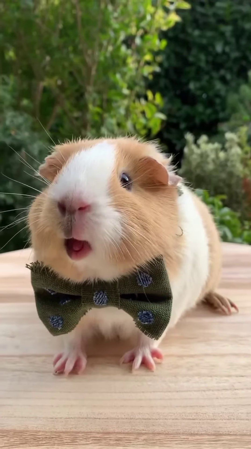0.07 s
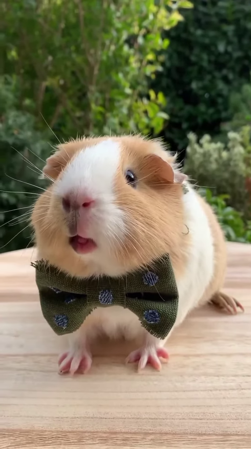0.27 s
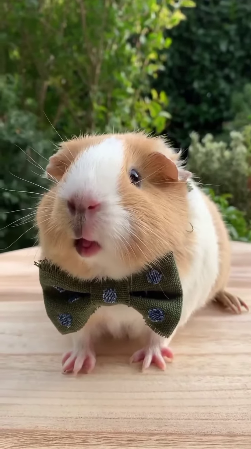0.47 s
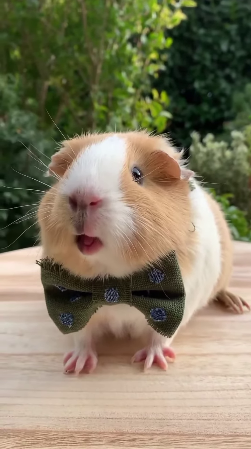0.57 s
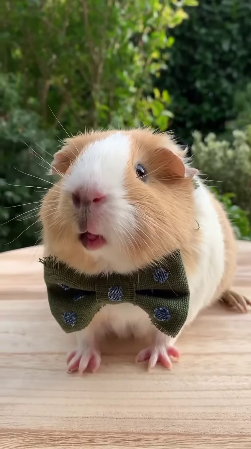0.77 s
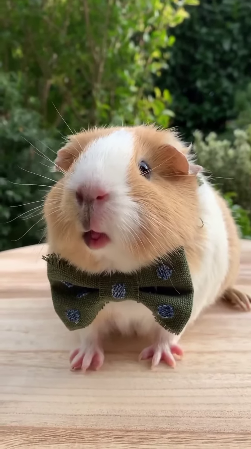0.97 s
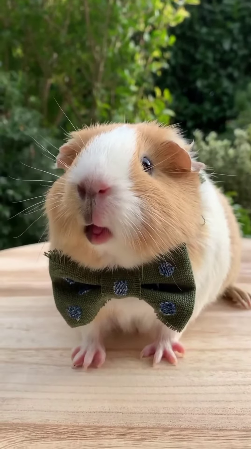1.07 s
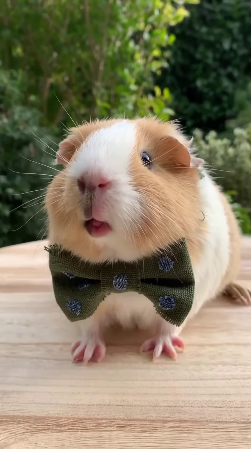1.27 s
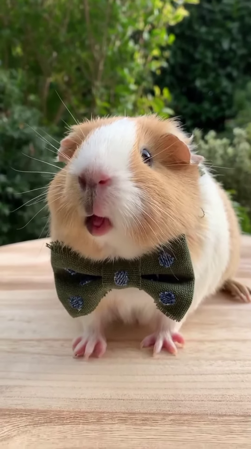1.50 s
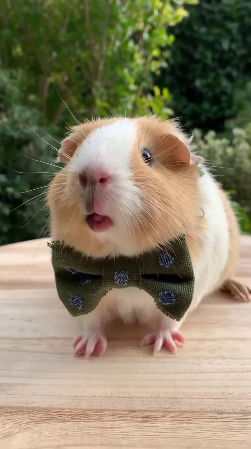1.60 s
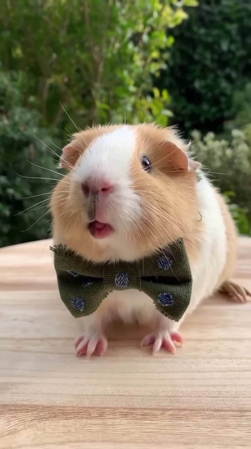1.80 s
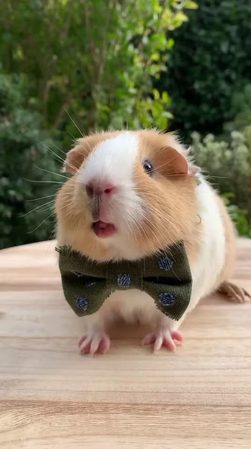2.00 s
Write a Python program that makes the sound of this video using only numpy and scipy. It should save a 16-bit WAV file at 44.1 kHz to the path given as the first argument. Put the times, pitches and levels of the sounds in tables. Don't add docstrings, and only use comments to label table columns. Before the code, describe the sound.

Close, piercing guinea pig squeaks rise one after another over a faint outdoor traffic rumble.

```python
import sys
import numpy as np
from scipy import signal
from scipy.fft import rfft, irfft, next_fast_len
from scipy.io import wavfile
from scipy.ndimage import uniform_filter1d

SR = 44100
rng = np.random.default_rng(int(sys.argv[2]) if len(sys.argv) > 2 else 0)


def voltage_ratio(level):
    return 10 ** (np.asarray(level, float) / 20)


def materialize(psi):
    bounded = np.clip(np.atleast_2d(psi).T, -1, 1)
    quanta = np.round(bounded * 32767).astype(np.int16)
    wavfile.write(sys.argv[1], SR, quanta)


N = 90404

# (f/Hz, level/dB)
TRAFFIC_COLOUR = [(25, -17.5), (45, -0.5), (66, 4.5), (90, -8.5), (125, -7.5), (220, -19), (700, -22),
                  (1100, -20.5), (1900, -30), (2700, -42.5), (5000, -68)]
# (f/Hz, likeness from 0 to 1)
TRAFFIC_LIKENESS = [(50, .9), (125, .82), (280, .7), (600, .3), (1300, .25), (3000, 0)]

# (t/s, pitch f/Hz, voice level/dB, overtone slope/dB per octave, breath level/dB)
WHEEK_1 = [(0, 754, -37, -9.5, -43), (.022, 1001, -36, -14.5, -46), (.046, 1809, -40, -11, -35),
           (.075, 1949, -32.5, -11.5, -52.5), (.105, 2099, -26, -10.5, -57),
           (.148, 2301, -21.5, -9.5, -61.5), (.18, 2357, -19, -10, -59), (.2, 2582, -23.5, -10, -58),
           (.214, 2691, -26.5, -9.5, -54), (.246, 2680, -30, -7, -46.5), (.254, 3006, -33.5, 1, -43.5),
           (.257, 3444, -33.5, -3, -46.5), (.28, 3850, -30.5, -10.5, -55), (.308, 3937, -27.5, -7, -50),
           (.330, 3882, -24, -17.5, -61.5)]
WHEEK_2 = [(.489, 945.8, -40.5, -16.5, -49.5), (.5, 782, -42.5, -4, -49.5),
           (0.514, 771.3, -35.5, -8.5, -45.5), (.54, 807.2, -38.5, -4.5, -54),
           (.553, 976, -37, -3.5, -36.5), (.564, 1391, -38, -6, -39.5), (.578, 1947, -42.5, -14.5, -30),
           (.596, 2064, -36.5, -15, -43), (.61, 2228, -27, -23, -36), (0.624, 2251, -30.5, -11.5, -35.5),
           (.63, 2562, -20.5, -18.5, -34.5), (.638, 2661, -35, -17.5, -52), (.648, 3117, -36, -8.5, -37),
           (0.659, 3184, -32, -9, -48.5), (.667, 3118, -33.5, -5.5, -47.5),
           (0.718, 3832, -25.5, -11.5, -51), (0.759, 3921, -20, -15.5, -48), (0.779, 3869, -24.5, -23, -46)]
WHEEK_3 = [(.946, 774.6, -37.5, -6, -61), (0.958, 722.2, -37.5, -15.5, -45.5),
           (0.976, 728, -33, -14.5, -53), (0.997, 757.4, -37, -10.5, -54), (1.01, 883.3, -38, -12, -41.5),
           (1.022, 1179, -36.5, -10, -46.5), (1.032, 1487, -42, -12, -44.5), (1.04, 1759, -48, -11, -36.5),
           (1.06, 1958, -44, -17.5, -42.5), (1.082, 2246, -38.5, -12, -43.5),
           (1.1, 2731, -31.5, -36.5, -42.5), (1.113, 3110, -43.5, -23, -45),
           (1.125, 3054, -33, -21.5, -52.5), (1.14, 3294, -32.5, -14.5, -44),
           (1.174, 3697, -27.5, -20, -58.5), (1.219, 3852, -21, -15.5, -53.5),
           (1.248, 3812, -26.5, -21, -44.5)]
WHEEK_4 = [(1.415, 765, -39, -10, -48.5), (1.435, 709, -33.5, -11, -66.5), (1.467, 773.7, -35.5, -9, -56),
           (1.479, 916, -35.5, -29.5, -43.5), (1.496, 1296, -37.5, -23, -45),
           (1.512, 1662, -48.5, -6.5, -39.5), (1.531, 2079, -51, -19.5, -43.5),
           (1.552, 2148, -36.5, -11, -46.5), (1.562, 2506, -33.5, -16.5, -40.5),
           (1.572, 2476, -43.5, -18.5, -43), (1.578, 3004, -41, -19, -36), (1.586, 2850, -50.5, -11, -46),
           (1.592, 3179, -33, -10.5, -45.5), (1.627, 3400, -31.5, -10.5, -39.5),
           (1.656, 3828, -32, -10.5, -57), (1.676, 3889, -26.5, -14.5, -49.5),
           (1.705, 3720, -29, -14.5, -57)]
WHEEK_5 = [(1.868, 769.3, -41, -8.5, -58), (1.889, 716.4, -34, -14, -64), (1.915, 763.4, -35.5, -9, -60.5),
           (1.93, 864.6, -41.5, -13, -53), (1.94, 1085, -36.5, -9.5, -47.5), (1.951, 1427, -45, -18, -49),
           (1.961, 1710, -49, -7.5, -48.5), (1.975, 1970, -75, -27.5, -46), (1.986, 2188, -37, -29.5, -38),
           (1.999, 2176, -30, -14, -75.5), (2.006, 2253, -39, -13, -29), (2.011, 2642, -43, -35, -45.5),
           (2.021, 2627, -38.5, -31.5, -43.5), (2.06, 3230, -43, -29, -45)]
# (t/s, length/s, level/dB against the voice)
UNEVEN_BEATS = [(0.295, 0.016, -14.5), (0.494, 0.015, -5), (0.539, 0.017, -6.5), (0.561, 0.019, -8),
                (0.589, 0.038, -20.5), (0.745, 0.03, -21), (1.022, 0.048, -3), (1.2, 0.019, -24),
                (1.522, 0.019, 3), (1.532, 0.022, -6), (1.642, 0.037, -14.5), (1.866, 0.012, -2),
                (1.928, 0.025, -1), (1.953, 0.028, 12), (1.986, 0.019, -5.5), (2.009, 0.049, -7.5)]
# (f/Hz, width/Hz, level/dB)
THROAT_AND_MOUTH = [(1400, 420, 13), (2300, 450, -4), (3900, 900, 7), (4500, 600, -8), (5400, 500, 16),
                    (5950, 600, 9), (7000, 800, -18), (7800, 900, 9), (9100, 1700, 18), (10700, 1000, 10),
                    (11900, 900, 5), (13300, 1500, -26)]
# (f/Hz, width/Hz, level/dB)
BREATH_BANDS = [(1250, 900, -3), (2300, 900, -5), (3300, 1100, -3), (4100, 700, -6), (6600, 1500, -8),
                (12200, 1700, -15)]

# (f/Hz, lead/radians)
HIGH_LEAD = [(3600, -4.5), (4000, -4.2), (4350, -3.2), (5000, -3.1), (5300, -2.1), (6370, -.1), (7100, -.1),
             (8440, 2.7), (10850, 6.1), (12230, 7.9), (12700, 9.4)]
# (f/Hz, lead/radians)
LOW_LEAD_FACING = [(0, 0), (1300, -1.2), (2040, -.9), (2200, -2.1), (2600, -2.3), (2720, -2.9)]
# (f/Hz, lead/radians)
LOW_LEAD_TURNED = [(0, 0), (900, -1.2), (1900, -1.6), (2100, -3), (2600, -3.2), (2800, -3.5), (3100, -3.8)]
# (f/Hz, level/dB)
PORT_TILT = [(300, -4.5), (730, 5.5), (1100, -1), (2000, 0), (2500, -1), (2750, -5), (3050, -1), (3900, .5),
             (13000, 0)]

# (t/s, level/dB)
PUFFS = [
    (0.252, -23),
    (0.338, -38.5),
    (0.495, -56.5),
    (0.779, -37.5),
    (0.948, -62),
    (1.251, -45),
    (1.71, -52.5),
]
# (f/Hz, level/dB)
PUFF_COLOUR = [(500, -36), (2500, -22), (4500, -8.5), (5700, 1), (6800, -7), (8500, -5), (10500, -14),
               (13000, -17)]


def at_hz(points, hz):
    p = np.array(points, float)
    return np.interp(np.log(hz + 1), np.log(p[:, 0] + 1), p[:, 1])


def coloured(points, channels):
    gain = voltage_ratio(at_hz(points, np.fft.rfftfreq(N, 1 / SR)))
    x = irfft(rfft(rng.standard_normal((channels, N))) * gain, N)
    return x / np.sqrt(np.mean(x ** 2))


def drift(hz):
    r = np.exp(-2 * np.pi * hz / SR)
    x = signal.lfilter([1], [1, -2 * r, r * r], rng.standard_normal(N + SR))[SR:]
    return x / x.std()


def gate(t, start, stop, rise, fall):
    fade_in = np.sin(np.pi / 2 * np.clip((t - start) / rise, 0, 1)) ** 2
    return fade_in * np.exp(-(np.maximum(t - stop, 0) / fall) ** 2)


def traffic():
    level_db, patchy_db = -52, 1.1
    alike = np.clip(at_hz(TRAFFIC_LIKENESS, np.fft.rfftfreq(N, 1 / SR)), -1, 1)
    shared, opposed = rfft(coloured(TRAFFIC_COLOUR, channels=2))
    left_right = np.array([[1], [-1]])
    both = irfft(np.sqrt(1 + alike) * shared + np.sqrt(1 - alike) * opposed * left_right, N)
    return voltage_ratio(level_db + patchy_db * drift(2.3)) * both


def hiss():
    return voltage_ratio(-84) * rng.standard_normal((2, N))


def tract_db(hz, opening):
    shut_loss_db, shut_from_hz = -14, 4300
    gape_loss = .8
    wide = np.clip(opening * 2.27 - .4, 0, 1)
    gape = 1 - gape_loss * np.clip(opening * 15 - 12, 0, 1)
    total_db = shut_loss_db * (1 - wide) / (1 + (shut_from_hz / hz) ** 6)
    for centre_hz, width_hz, db in THROAT_AND_MOUTH:
        peak_db = db / (1 + (2 * (hz - centre_hz) / width_hz) ** 2)
        if centre_hz > 5000:
            peak_db = peak_db * wide
        if 9000 < centre_hz < 11000:
            peak_db = peak_db * gape
        total_db = total_db + peak_db
    return total_db


def breath(opening):
    open_rise, open_bright_db, patchy_db = .25, 3, 3
    streak_hz, streak_db = 170, 5
    hz = np.fft.rfftfreq(N, 1 / SR)
    white = rfft(rng.standard_normal(N))
    ridges_db = streak_db * rng.standard_normal(200)
    out = 0
    for centre_hz, width_hz, db in BREATH_BANDS:
        patch = voltage_ratio(db + patchy_db * drift(25) + open_bright_db * opening * (centre_hz > 4000))
        for step in range(6):
            shut_hz = hz / (1 + open_rise * step / 5 * (centre_hz < 10000))
            ridges = voltage_ratio(np.interp(shut_hz / streak_hz, np.arange(200), ridges_db))
            gain = ridges / (1 + (2 * (shut_hz - centre_hz) / width_hz) ** 8)
            share = np.maximum(1 - abs(opening * 5 - step), 0)
            out = out + patch * irfft(white * gain, N) * share
    return out / out.std()


def voice(hz, slope_db, opening, strain):
    t = np.arange(N) / SR
    jitter, wobble = .005, .0025
    shimmer, fringe = .07, .045
    blur = .35
    flicker_db = 2.5
    half_db_per_octave, lowest_half_db = -24, -10.5
    rough_share = np.minimum(strain, 3)
    hz = hz * (1 + jitter * rough_share * drift(170) + wobble * drift(64))
    phase = 2 * np.pi * np.cumsum(hz) / SR
    half = sum(voltage_ratio(db) * gate(t, s, s + length, .006, .004) for s, length, db in UNEVEN_BEATS)
    shiver, edge = drift(230), drift(500)
    out = 0
    for k in np.arange(1, 37) / 2:
        db = tract_db(k * hz, opening) + slope_db * np.log2(max(k, 1))
        if k % 1:
            db = db + half_db_per_octave * np.log2(max(k / 1.44, 1))
        if k < 1:
            db = db + lowest_half_db
        if k > 2:
            db = db + flicker_db * drift(30)
        shift = int(k * 3001)
        rough = 1 + shimmer * k * rough_share * np.roll(shiver, shift)
        rough = rough + fringe * (k - 1) * np.roll(edge, shift)
        rough = rough / (1 + blur * max(k - 2.5, 0) * rough_share)
        height = voltage_ratio(db) * (half if k % 1 else 1) * (k * hz < .4 * SR)
        out = out + height * rough * np.sin(k * phase + k * k)
    return out


def wheeks():
    t = np.arange(N) / SR
    attack_s, release_s = .0045, .002
    calls = [WHEEK_1, WHEEK_2, WHEEK_3, WHEEK_4, WHEEK_5]
    rows = np.concatenate(calls)
    curves = [uniform_filter1d(np.interp(t, rows[:, 0], rows[:, k]), size=150) for k in range(1, 5)]
    hz, effort_db, slope_db, breath_db = curves
    on = 0
    for number, call in enumerate(calls):
        start = call[0][0] - (number == 0)
        on = on + gate(t, start, call[-1][0], attack_s, release_s)
    opening = np.clip(np.log(hz / 750) / np.log(5.2), 0, 1)
    strain = voltage_ratio(breath_db - effort_db + 18)
    tone = voltage_ratio(effort_db) * np.sqrt(2) * voice(hz, slope_db, opening, strain)
    return on * (tone + voltage_ratio(breath_db) * breath(opening))


def ports(x, low_lead):
    size = next_fast_len(N + 4096)
    hz = np.fft.rfftfreq(size, 1 / SR)
    lead = np.interp(hz, *np.transpose(low_lead + HIGH_LEAD))
    turn = voltage_ratio(at_hz(PORT_TILT, hz) / 2) * np.exp(.5j * lead)
    return irfft(rfft(x, size) * np.array([turn, 1 / turn]), size)[:, :N]


def echo(x):
    level_db, fade_60db_s, delay_s, cut_hz = -31, .19, .011, 5500
    t = np.arange(SR // 2) / SR
    tail = rng.standard_normal((2, len(t))) * voltage_ratio(-60 * t / fade_60db_s) * (t > delay_s)
    tail = signal.sosfilt(signal.butter(2, cut_hz, fs=SR, output="sos"), tail)
    tail = tail / np.sqrt(np.sum(tail ** 2) / 2)
    return voltage_ratio(level_db) * signal.fftconvolve(x[None], tail, axes=1)[:, :N]


def puffs():
    t = np.arange(N) / SR
    puff_s = .0061
    bursts = sum(voltage_ratio(db) * np.exp(-((t - s) / puff_s) ** 2) for s, db in PUFFS)
    return coloured(PUFF_COLOUR, channels=1)[0] * bursts


def scene():
    head_turn_s = .42
    animal = wheeks() + puffs()
    turned = np.arange(N) / SR > head_turn_s
    heard = ports(animal * ~turned, LOW_LEAD_FACING) + ports(animal * turned, LOW_LEAD_TURNED)
    return heard + echo(animal) + traffic() + hiss()


def band_limit(x):
    return signal.sosfilt(signal.butter(12, 13760, fs=SR, output="sos"), x)


def record(dry):
    top_cut = signal.cheby2(12, 60, 14600, fs=SR, output="sos")
    return band_limit(signal.sosfilt(top_cut, dry))


dry = scene()
out = record(dry)
materialize(out)
```